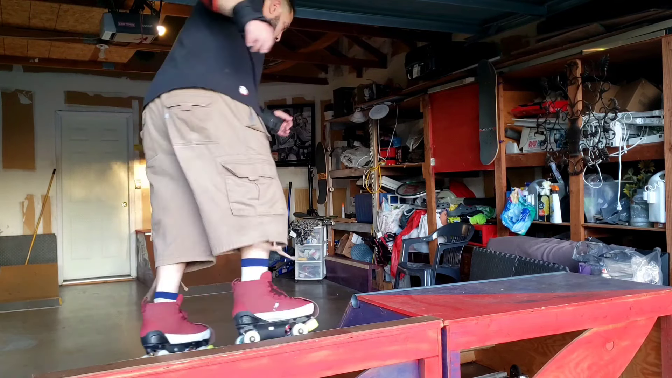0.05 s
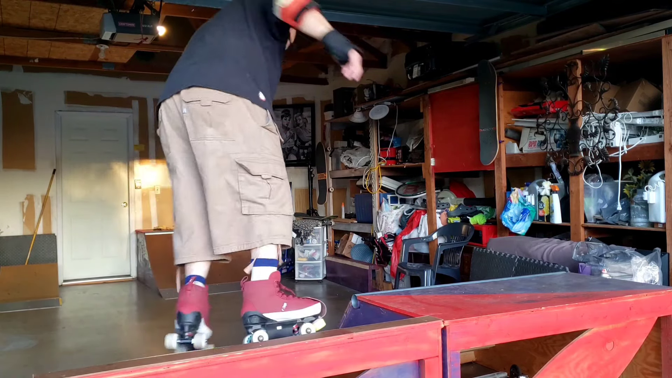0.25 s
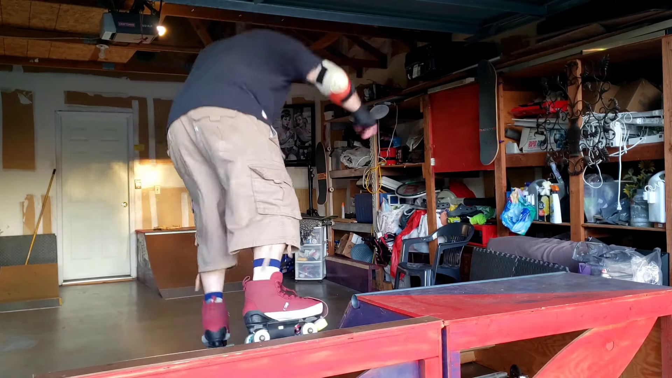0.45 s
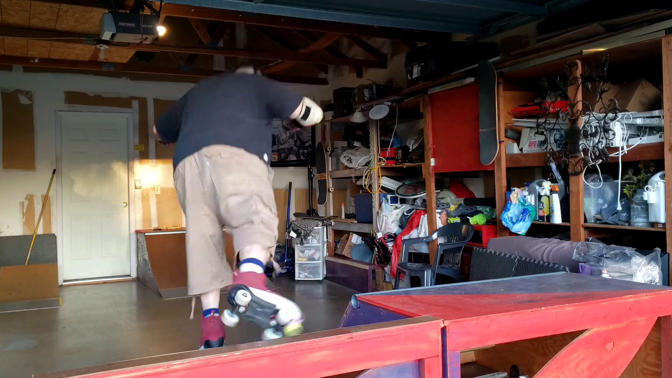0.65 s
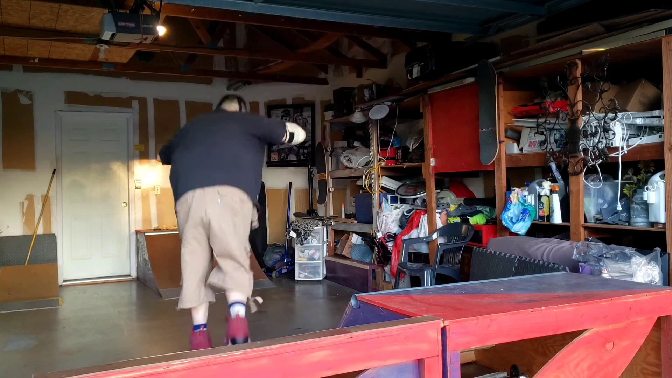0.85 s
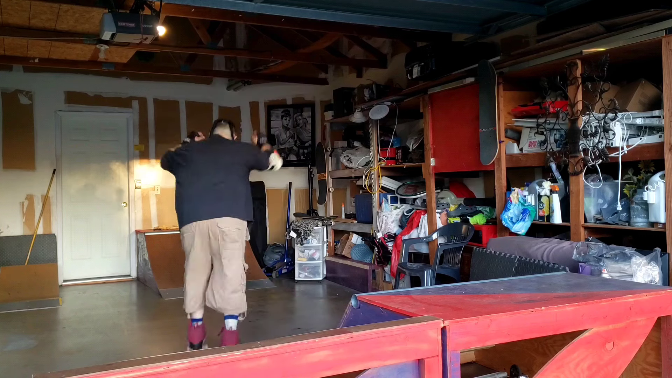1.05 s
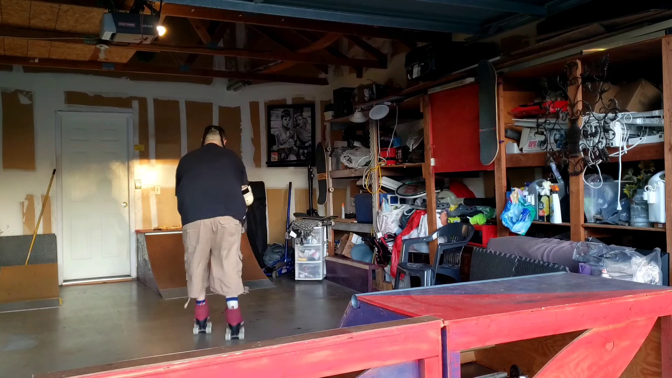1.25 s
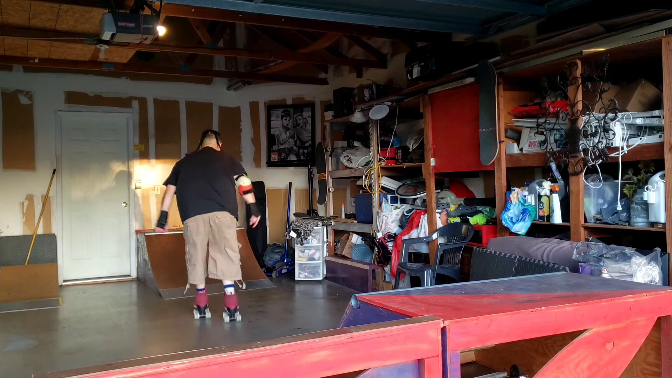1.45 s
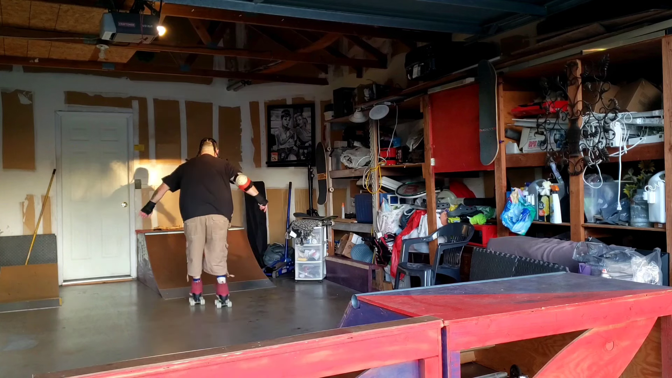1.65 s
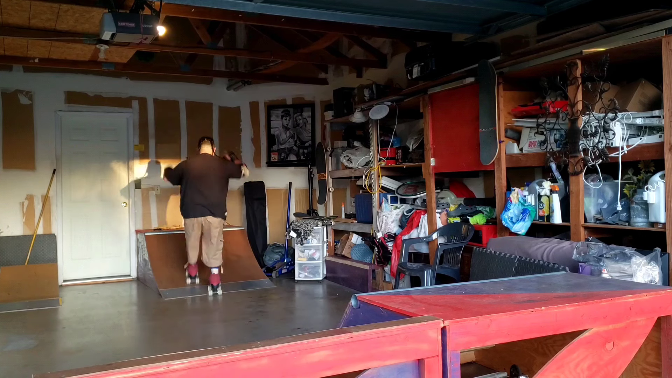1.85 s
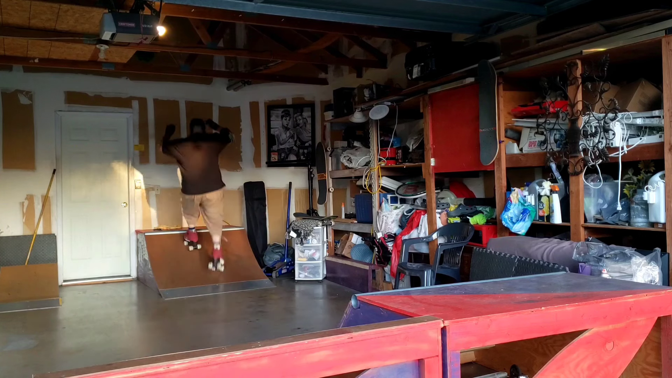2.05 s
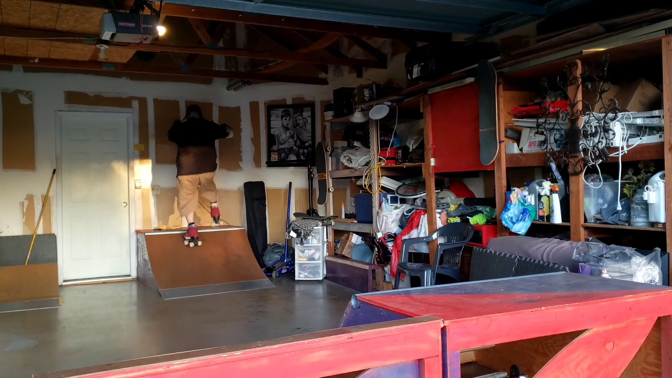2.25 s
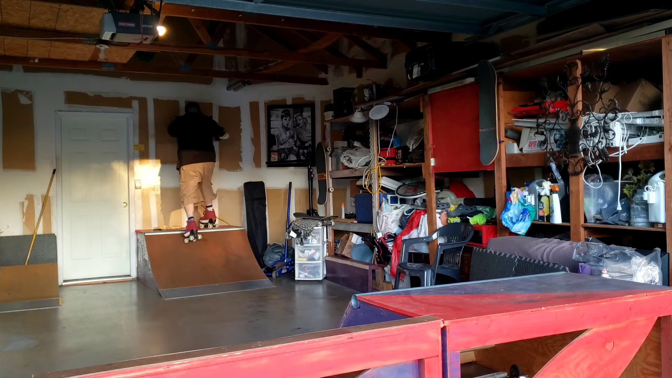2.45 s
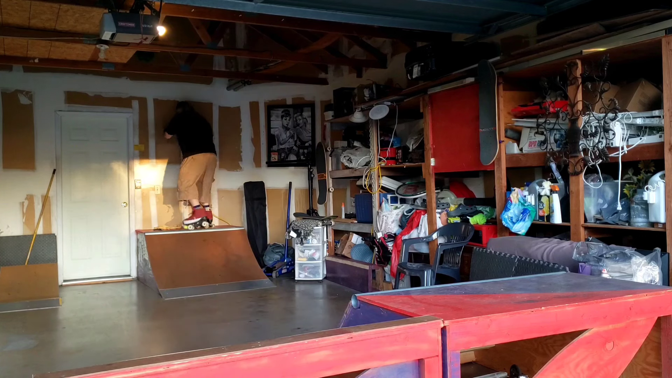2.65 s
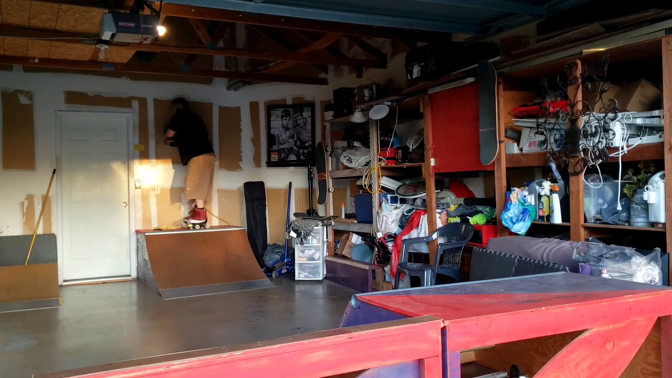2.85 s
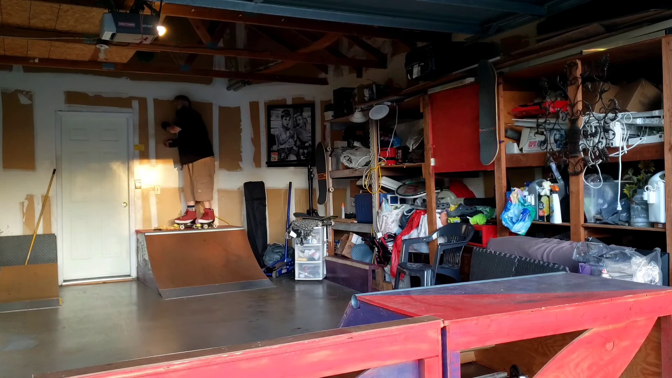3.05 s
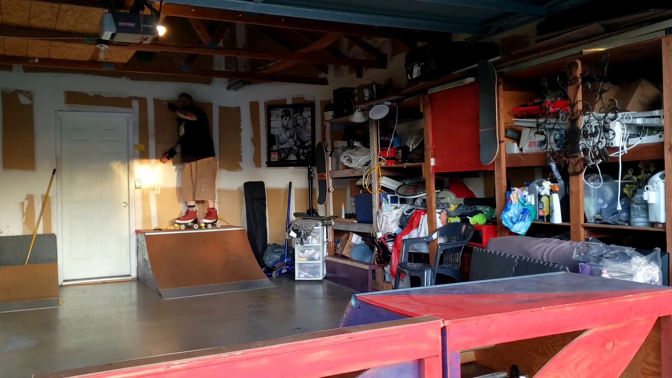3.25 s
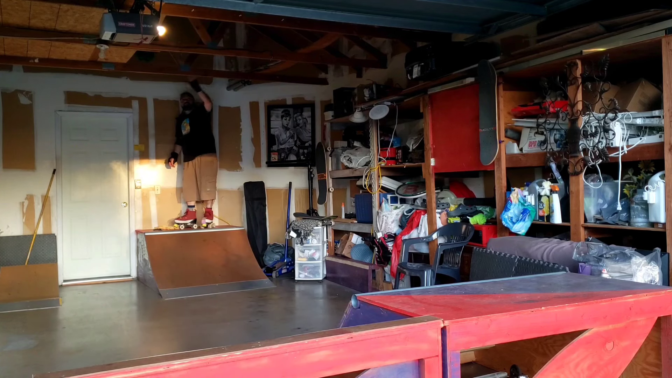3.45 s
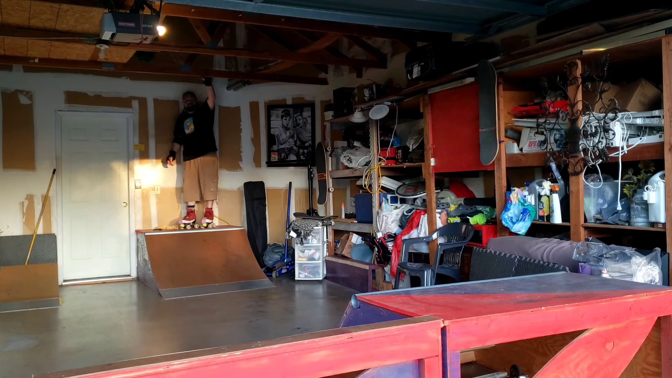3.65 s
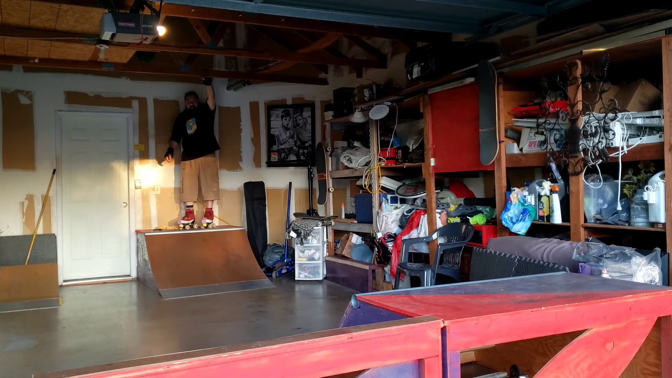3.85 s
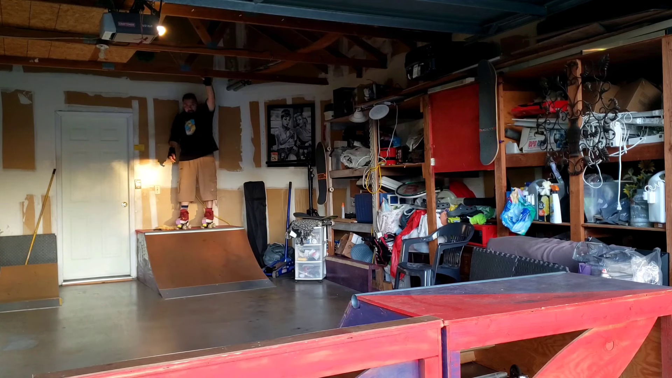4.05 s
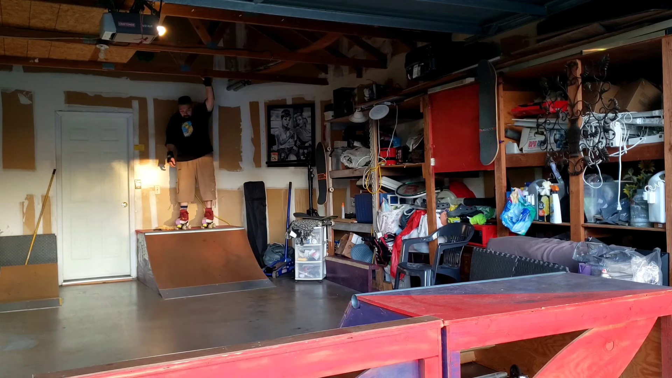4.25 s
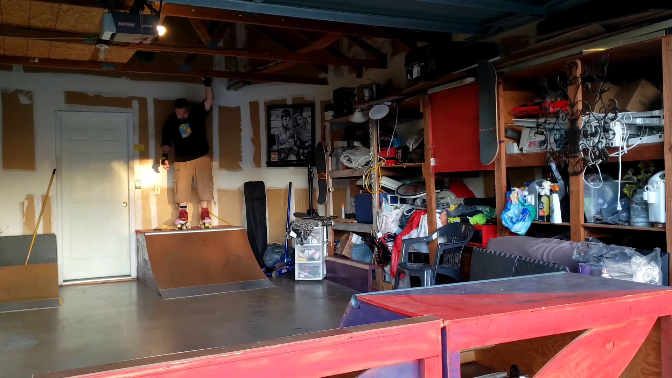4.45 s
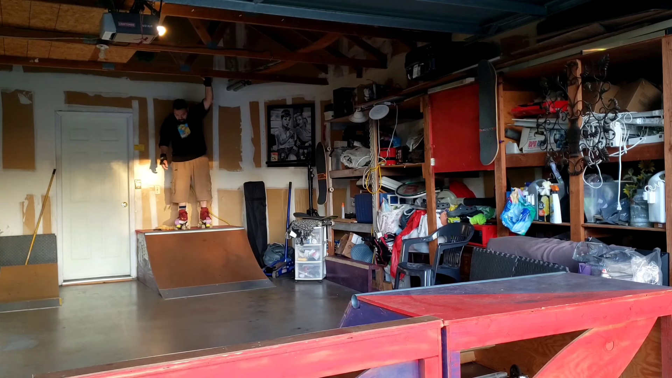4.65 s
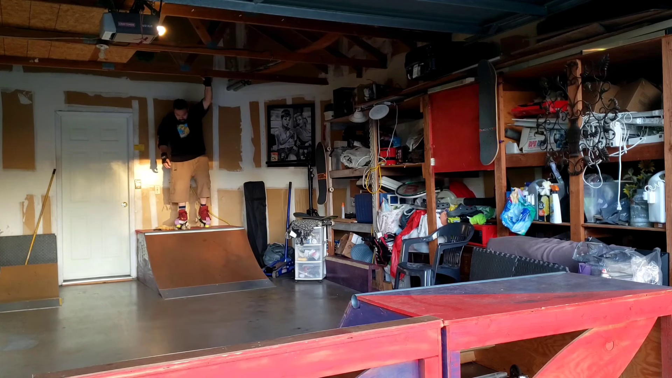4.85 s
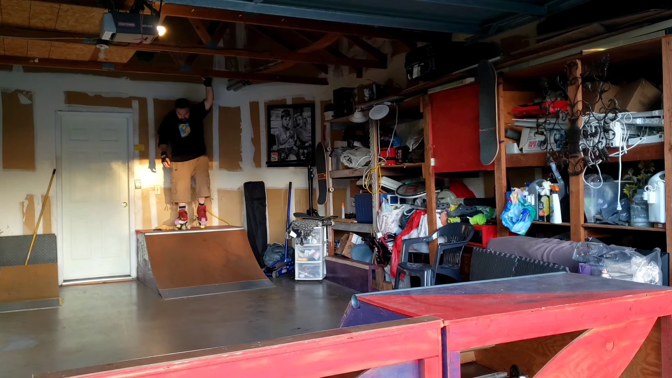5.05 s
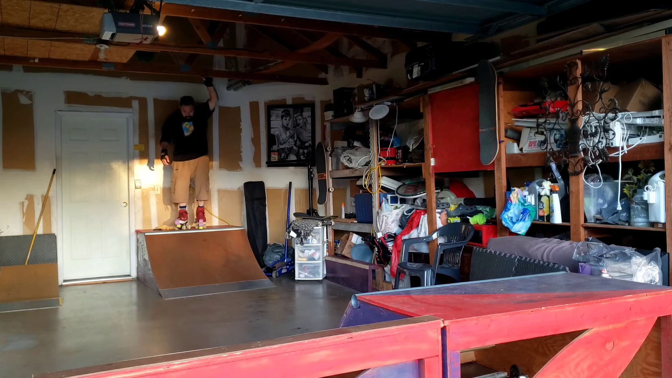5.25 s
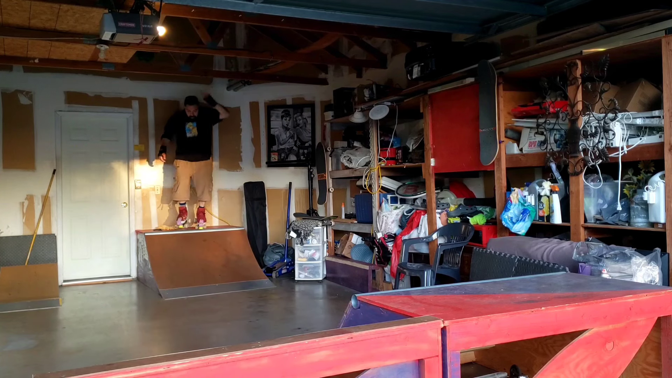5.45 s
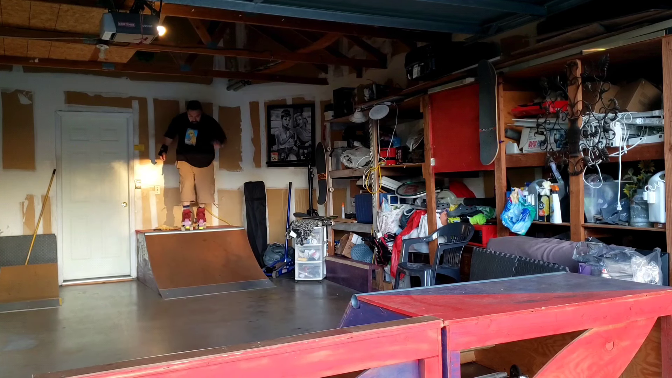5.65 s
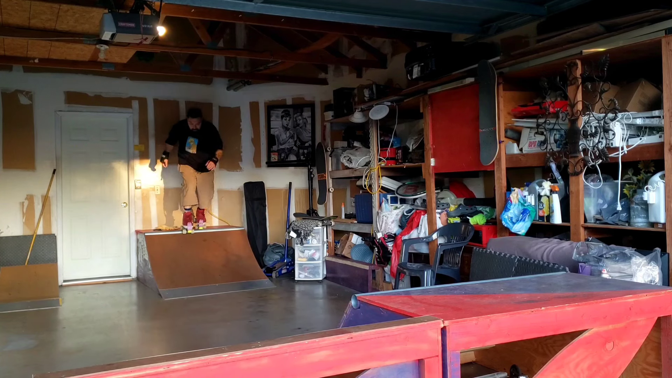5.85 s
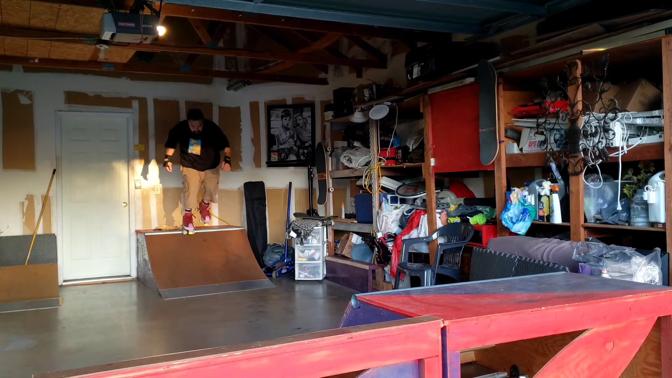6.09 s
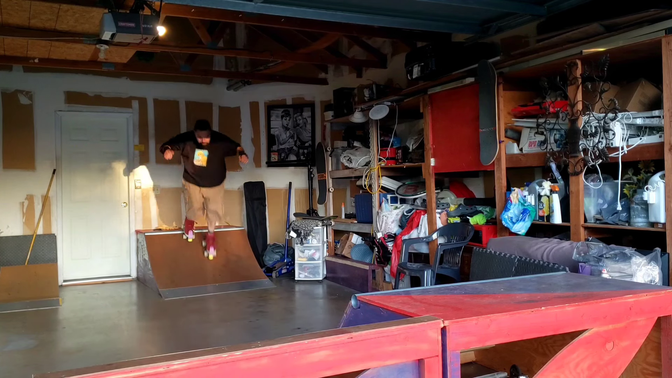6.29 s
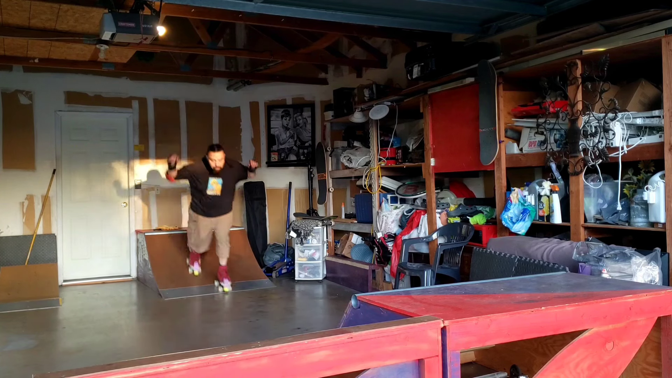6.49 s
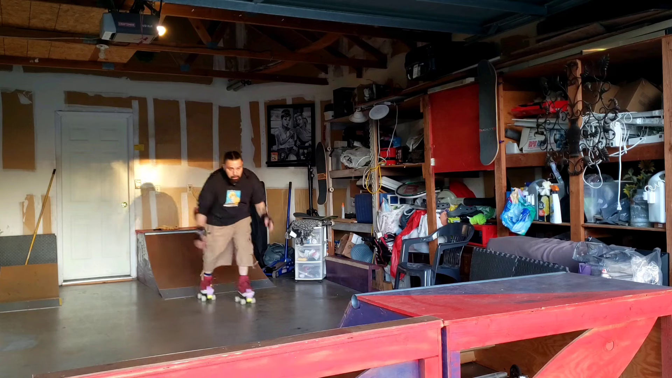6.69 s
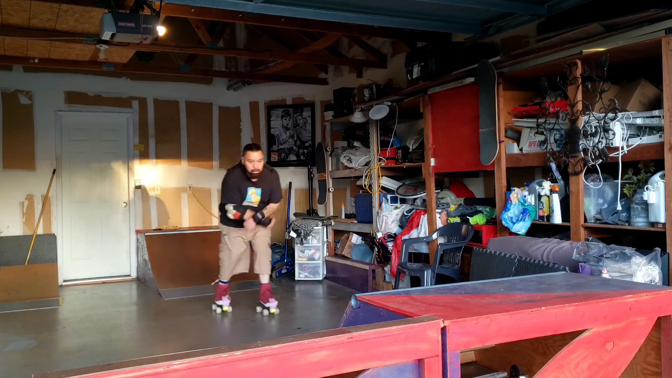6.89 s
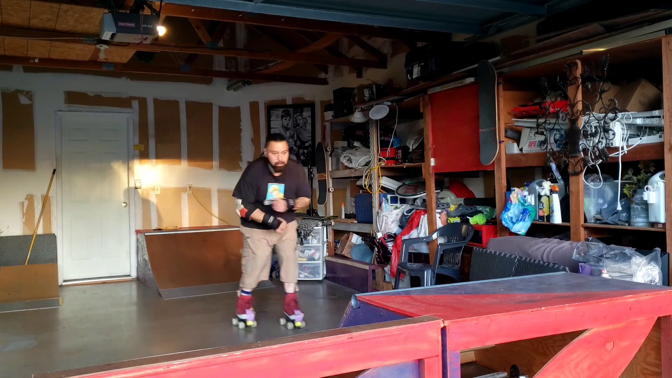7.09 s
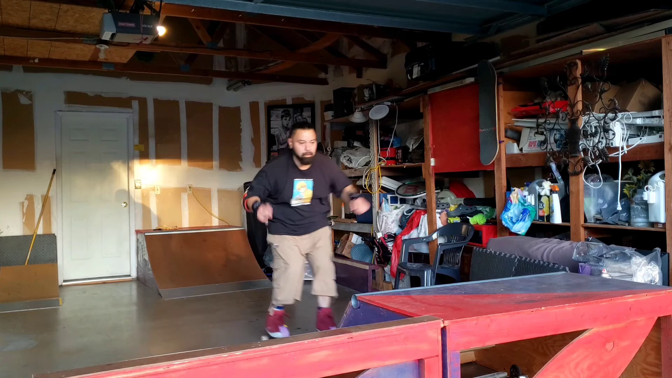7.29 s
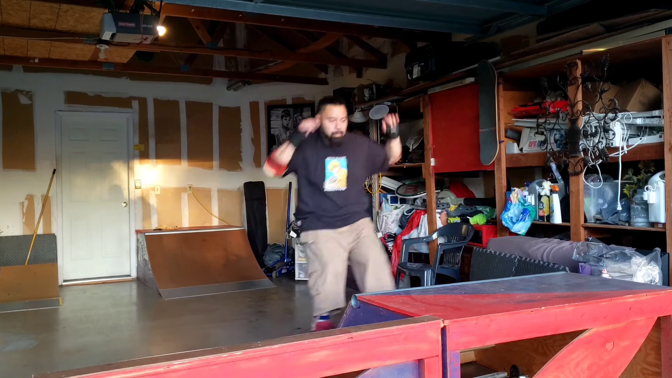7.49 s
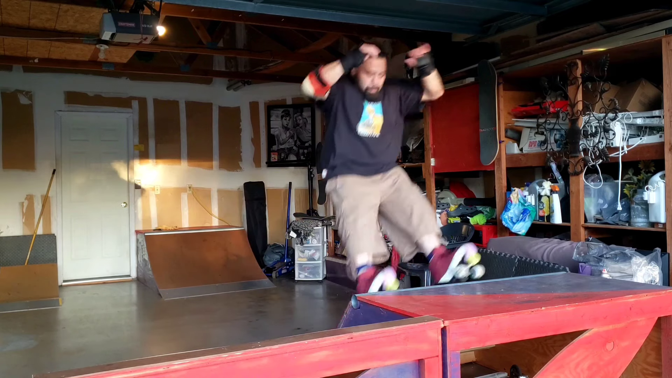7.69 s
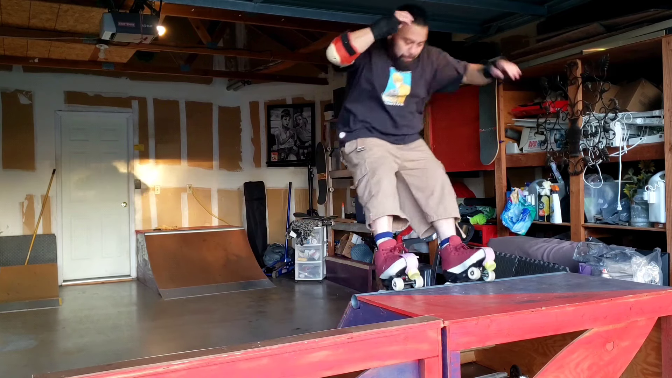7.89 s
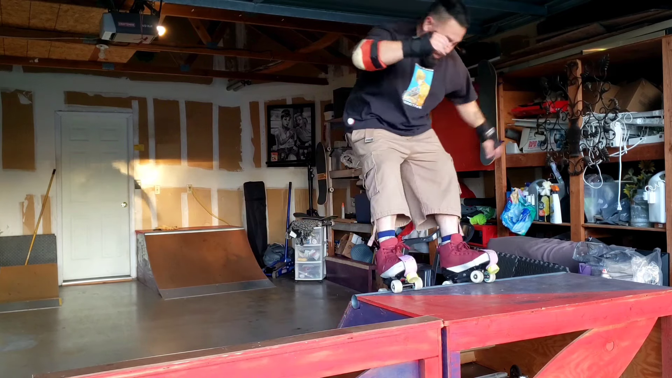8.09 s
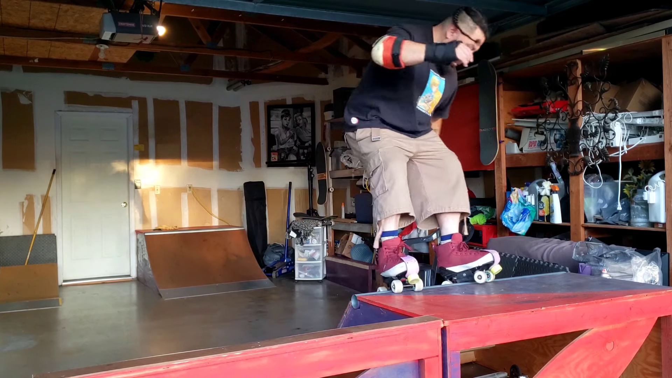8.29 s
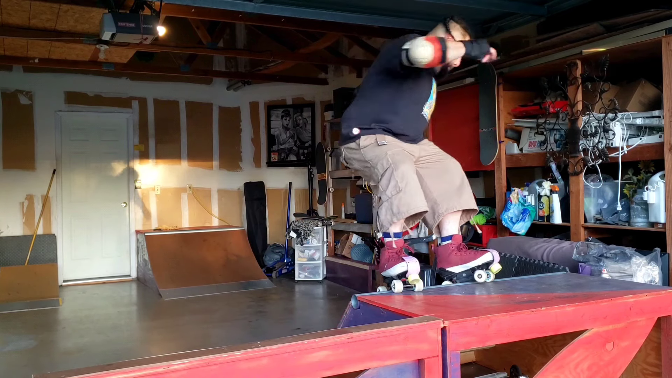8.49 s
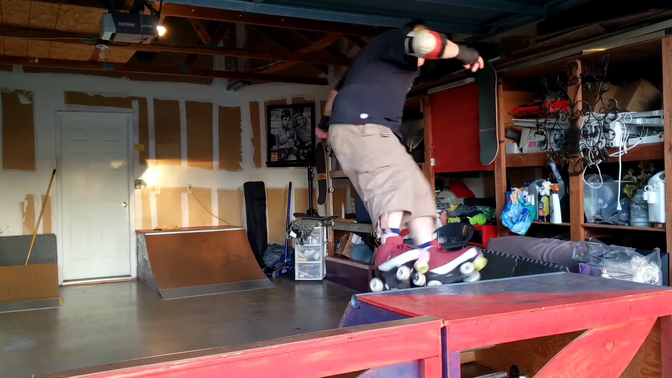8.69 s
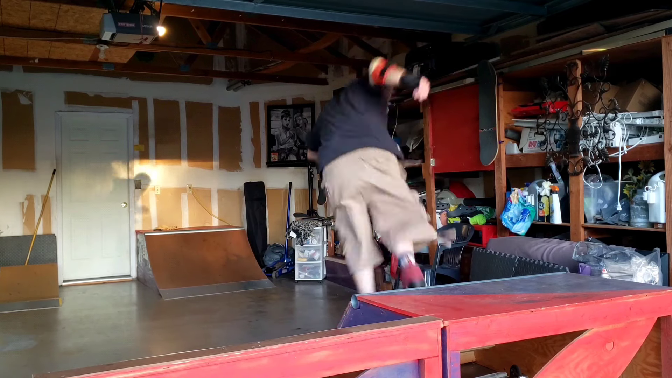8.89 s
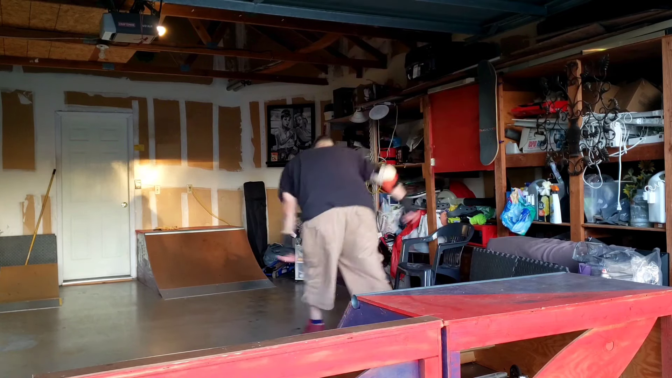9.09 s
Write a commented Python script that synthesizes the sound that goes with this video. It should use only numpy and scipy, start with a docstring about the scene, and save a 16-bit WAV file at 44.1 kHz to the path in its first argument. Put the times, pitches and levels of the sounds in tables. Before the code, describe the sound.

Roller skates shift on a plywood ramp close to the microphone, with light knocks, ticks and tiny squeaks. At about 1 second the wheels roll down with a loud clack and hollow thumping. Around 2 seconds they clatter onto a farther ramp, followed by a sharp, hard knock at 2.6 seconds. From 3 to 5.5 seconds there are only softer knocks and rattles, and a faint engine speeds up outside from about 4 to 6.5 seconds. Near 6 seconds the skates knock again, then clack and rumble down the far ramp until about 7. From 7.5 to 8 seconds they hit the near ramp with a loud run of booming thumps and rattles. A few faint squeaks follow, and a last heavy thud lands just after 9 seconds. The garage adds a short echo, and low traffic hum continues underneath.

```python
"""Skater in a concrete garage

A skater rolls to and fro between two plywood ramps, one close, one far. Wheels clack over edges,
loose trucks rattle, bearings squeak; the hollow ramps thump and boom while ridden. The garage
rings for about 0.4 s. Street noise and a passing engine come in from outside."""
import sys
import numpy as np
from scipy import signal
from scipy.fft import rfft, irfft, next_fast_len
from scipy.io import wavfile
from scipy.ndimage import uniform_filter1d

SR = 44100
rng = np.random.default_rng(int(sys.argv[2]) if len(sys.argv) > 2 else 0)


def store_pcm(level_fs):
    """Save levels as 16-bit WAV."""
    pcm = np.round(np.clip(level_fs, -1, 1) * 32767).astype(np.int16)
    wavfile.write(sys.argv[1], SR, np.atleast_2d(pcm).T)


N = 402633

# wheels and trucks striking edges: t/s, knock/dB, struck spot f/Hz, rattle/dB, tick/dB
STRIKES = [(.212, -35, 340, -50, -50), (.239, -29.5, 353, -42.5, -54), (.745, -36, 303, -57, -66),
           (1.051, -32, 332, -47, -56), (1.077, -31, 300, -41, -50), (1.086, -16, 340, -32.5, -43),
           (1.98, -32, 503, -36, -29), (1.987, -21.5, 630, -41, -37), (2.017, -19, 487, -29, -24),
           (2.07, -17, 316, -38.5, -26.5), (2.105, -18, 560, -33.5, -25.5), (2.23, -31, 450, -48, -81),
           (2.269, -35.5, 495, -47, -65), (2.622, -22.5, 364, -41.5, -59), (2.647, -10, 485, -19.5, -63),
           (2.875, -34.5, 310, -42, -48.5), (3.02, -28.5, 373, -39.5, -51), (3.031, -28.5, 394, -40.5, -56),
           (3.047, -23.5, 392, -41.5, -75), (3.245, -34.5, 384, -50, -64), (3.8, -25.5, 420, -44.5, -59),
           (4.262, -36, 300, -53.5, -68), (4.505, -52, 404, -60, -78), (4.603, -40.5, 445, -48.5, -67),
           (4.83, -46, 635, -52, -75), (5.11, -47, 474, -58, -89), (5.349, -44, 339, -46, -59),
           (5.435, -44, 425, -50, -76), (5.91, -23, 416, -40.5, -60), (5.944, -22, 845, -32, -69),
           (6.22, -43.5, 530, -48.5, -78), (6.38, -55, 412, -50.5, -86), (6.444, -37, 470, -48.5, -83),
           (6.462, -37.5, 320, -53.5, -73), (6.533, -16.5, 444, -31.5, -48), (6.605, -21, 464, -34.5, -48),
           (6.681, -16.5, 480, -34.5, -29), (6.715, -17.5, 480, -45, -46), (6.732, -25.5, 325, -29.5, -67),
           (6.824, -19.5, 483, -34, -35), (6.84, -26, 466, -51, -52), (7.05, -45.5, 344, -50.5, -57),
           (7.559, -31, 380, -53, -54), (7.565, -25, 397, -29, -30), (7.617, -29, 397, -28, -25.5),
           (7.671, -19, 310, -33, -34), (7.879, -15, 445, -27, -52), (7.929, -12, 830, -27.5, -39),
           (8.014, -24.5, 865, -32, -67), (8.247, -43.5, 301, -58, -62.5), (8.7, -42.5, 342, -60, -93),
           (9.112, -16, 332, -28, -41)]
# deck modes: f/Hz, level/dB, t60/s
DECK_MODES = [(279.7, -4, 0.053), (339.7, -2.5, 0.076), (414.7, 0.5, 0.04), (470, -5, 0.06),
              (573.5, -3, 0.03), (644, -4.5, 0.052), (756.5, -2.5, 0.043), (845, 0, 0.03),
              (971, 1.5, 0.021), (1147, -2.5, 0.031), (1323, 3, 0.016)]
# truck and wheel hardware spectra, mid to top treble: f/Hz, level/dB
RATTLE_SPECTRUM = [(600, -5.5), (1000, 5.5), (1600, 4), (2500, -2), (4200, -9.5), (6000, -24.5)]
CLICK_SPECTRUM = [(3300, -15), (4800, 6.5), (7800, 12), (9500, -25)]
TICK_SPECTRUM = [(7500, -16), (9000, 4.5), (15000, -9)]
# plywood thumps, from landings and wheels bumping over seams: t/s, level/dB, f/Hz
PLYWOOD_THUMPS = [(.21, -40, 232), (.235, -22.5, 150), (0.741, -36, 101), (.774, -28, 95), (1.054, -16.5, 214),
                  (1.081, -9, 172), (1.121, -12.5, 247), (1.167, -13.5, 208), (1.193, -13, 230),
                  (1.244, -26.5, 235), (2.043, -23, 273), (2.087, -20, 264), (2.14, -17.5, 142),
                  (2.205, -23, 144), (2.272, -21.5, 128), (2.647, -10, 148), (2.668, -15, 205.4),
                  (2.686, -15, 96.4), (2.885, -34, 112), (3.034, -28, 185), (3.254, -34.5, 344),
                  (3.58, -36.5, 307), (3.805, -32.5, 387), (3.849, -34.5, 176), (4.261, -33.5, 268),
                  (4.306, -37, 118), (5.913, -29.5, 347), (5.947, -22, 157), (6.537, -21, 133),
                  (6.607, -19.5, 171), (6.681, -10.5, 144), (6.723, -12.5, 159), (6.795, -17, 149),
                  (6.832, -24, 136), (7.565, -22.5, 164), (7.619, -9.5, 180), (7.664, -8.5, 188),
                  (7.697, -7, 173.5), (7.741, -10.5, 224), (7.884, -16.5, 183), (7.937, -12, 150),
                  (7.953, -17, 180), (8.016, -20.5, 178), (8.059, -24.5, 176), (8.253, -34.5, 107),
                  (9.108, -22, 175), (9.113, -8, 175)]
# air under a ramp: t/s, level/dB, f/Hz, hold/s
CAVITY_BOOMS = [(0.759, -36, 62.9, 0.052), (.905, -39, 63.3, 0.037), (1.05, -19.5, 73, .03),
                (1.148, -25, 66.7, 0.025), (1.269, -30.5, 72, 0.013), (2.03, -28.5, 54.2, 0.13),
                (2.28, -23.5, 55.3, 0.066), (2.651, -25, 67, .01), (2.885, -36, 64, 0.014),
                (3.051, -41.5, 66.8, 0.087), (3.81, -41, 53.8, 0.055), (5.94, -24, 56.7, 0.057),
                (6.465, -29, 56, .02), (6.551, -21.5, 55.3, .18), (6.84, -30, 54.8, .02),
                (7.62, -19.5, 77.8, 0.039), (7.75, -22.5, 71.4, 0.013), (7.894, -25, 71.7, 0.12)]
# rides over plywood: t/s, length/s, rolling/dB, its swell/(dB/s), hiss/dB, its swell/(dB/s)
RAMP_RIDES = [(.7, 0.18, -54, -5, -72.5, 7), (1.06, 0.17, -34.5, 31, -55.5, 48),
              (1.978, 0.12, -38, 14, -44, -5), (3.0, 0.14, -44.5, -27, -61, -35),
              (3.497, 0.054, -58, 63, -68, -35), (6.53, 0.34, -44.5, 25, -60.5, 31),
              (7.56, 0.17, -28, -47, -33, -110)]
# wheel grit and bearing hiss spectra: f/Hz, level/dB
GRIT_SPECTRUM = [(59, -44.5), (100, 3), (173, 1), (244, -2.5), (305, -15), (604, -7.5), (670, -16),
                 (755, -14.5), (1140, -23), (6000, -40.5), (7800, -77), (13200, -120)]
BEARING_SPECTRUM = [(2500, 2), (5000, 0.5), (9000, 9), (14000, 2)]
# plywood modes: f/Hz, level/dB, t60/s
PANEL_MODES = [(143, 6, 0.044), (185, 4, 0.057), (230, 0, 0.039), (277, -3, 0.093)]
# small hardware ticking: t/s, level/dB
HARDWARE_TICKS = [(0.012, -42.5), (.091, -52.5), (.099, -69), (0.315, -43.5), (.426, -40.5), (.631, -44.5),
                  (1.536, -49), (1.648, -57), (1.671, -54.5), (8.569, -58.5)]
# bearing and cushion squeaks: t/s, length/s, start f/Hz, end f/Hz, level/dB, bandwidth/Hz
SQUEAK_GLIDES = [(0.005, 0.011, 5360, 5500, -49, 201), (0.315, 0.0068, 3520, 3500, -49, 600),
                 (0.45, 0.075, 3580, 3090, -68, 200), (0.965, 0.062, 3570, 3160, -70, 250),
                 (5.353, 0.028, 4630, 4550, -59, 100), (5.428, 0.015, 4040, 3980, -57, 200),
                 (7.046, 0.034, 3330, 3450, -65, 150), (8.246, 0.045, 2450, 2300, -69, 300),
                 (8.436, 0.055, 2090, 2050, -66, 496), (8.875, 0.175, 2760, 2700, -76, 60)]
# skater's path: t/s, direct gain/dB, left over right/dB
SKATER_PATH = [(0, 2, 3), (1.302, 2, 2), (1.9, -3, 2), (2.5, -3, 3), (3.5, -12, 2.5), (5.7, -1.5, 4),
               (6.4, -3, 2.5), (7.401, 0.5, 2), (9.2, -7.5, 2)]
# garage decay: f/Hz, t60/s
GARAGE_T60 = [(60, 0.21), (160, 0.39), (420, 0.43), (1100, 0.38), (2900, 0.36), (7700, 0.35), (14000, 0.33)]
# diffuse sound: f/Hz, left-right coherence
COHERENCE = [(60, 0.83), (250, .96), (500, 0.75), (1000, 0.12), (2000, 0.063), (8000, 0.056)]
# traffic spectrum: f/Hz, level/dB
STREET_SPECTRUM = [(18, -62), (30, -3.5), (59, 6.5), (154, -9), (180, -5), (240, -12.5), (426, -19.5),
                   (497, -19), (978, -26), (1920, -39.5), (4200, -45.5), (8470, -47.5), (9890, -48.5),
                   (13900, -46.5), (15000, -63)]
# traffic swell: t/s, level/dB, treble gain/dB
STREET_SWELL = [(0, -44, 3), (1.5, -40, 0.5), (2.502, -43, 1), (3.4, -43, 2), (4.3, -45, -5), (5, -42, -5),
                (5.502, -37.5, -9.5), (6.3, -40, -5), (7.2, -36.5, -4.5), (8.3, -44, -2), (9.2, -43.5, 0.5)]
# passing engine: t/s, firing f/Hz, level/dB
ENGINE_PASS = [(4.1, 76.2, -67), (4.5, 81.45, -59.5), (5.0, 90.4, -54.5), (5.6, 102.5, -55),
               (6.2, 107.5, -52.5), (6.7, 108.1, -56)]
# engine harmonics: multiple of firing rate, level/dB
ENGINE_HARMONICS = [(1, 6), (2, -1), (3, 6), (4, -1.5), (5, 2.5), (6, -3)]
# microphone response: f/Hz, gain/dB
MIC_RESPONSE = [(18, -22.5), (33, -9.5), (60, -4), (6500, 5.5), (7800, -2), (8600, -12), (9600, -5),
                (11500, 2), (14000, 0.5)]


def gain(db):
    """dB to amplitude factor."""
    return 10 ** (np.asarray(db) / 20)


def unit_rms(x):
    """Scale to rms 1."""
    return x / np.sqrt(np.mean(x ** 2) + 1e-20)


def lookup(table, hz):
    """Interpolate over log frequency."""
    table_hz, value = np.transpose(table)
    return np.interp(np.log(hz + 1), np.log(table_hz + 1), value)


def curves(table, t):
    """Interpolate each column at times t/s."""
    table_s, *columns = np.transpose(table)
    return [np.interp(t, table_s, column) for column in columns]


def filtered(x, spectrum):
    """Apply a dB spectrum."""
    size = x.shape[-1]
    return irfft(rfft(x) * gain(lookup(spectrum, np.fft.rfftfreq(size, 1 / SR))), size)


def noise(size, spectrum):
    """Coloured noise, rms 1."""
    return unit_rms(filtered(rng.standard_normal(size), spectrum))


def diffuse_noise(field_db):
    """Stereo noise from a bins x frames field, coherent in the bass."""
    a, b, c, d = rng.standard_normal((field_db.shape[1], len(field_db), 4)).T
    hz = np.linspace(0, SR / 2, len(field_db))
    coherence = np.clip(lookup(COHERENCE, hz), 0, 1)[:, None]
    left = a + 1j * b
    right = coherence * left + np.sqrt(1 - coherence ** 2) * (c + 1j * d)
    size = 2 * len(field_db) - 2
    return signal.istft(gain(field_db) * [left, right], nperseg=size, noverlap=3 * size // 4)[1]


def add(mix, start_s, sound):
    """Mix in at start_s."""
    part = mix[round(start_s * SR):][:len(sound)]
    part += sound[:len(part)]


def deck_knock(t, spot_hz, contact_s):
    """Struck deck, peak 1; modes near the spot's pitch ring loudest."""
    phases = rng.uniform(0, 2 * np.pi, len(DECK_MODES))
    ring = np.zeros(len(t))
    for (hz, db, t60_s), phase in zip(DECK_MODES, phases):
        octaves_off = abs(np.log2(hz / spot_hz))
        ring += gain(db - 8.1 * octaves_off - 60 * t / t60_s) * np.sin(2 * np.pi * hz * t + phase)
    knock = ring * (1 - np.exp(-t / (0.00056 + contact_s)))
    return knock / abs(knock).max()


def wheel_clacks():
    """Strikes ring the deck, jolt and rattle the trucks. Returns stereo direct, mono garage send."""
    direct, send, t = np.zeros((2, N)), np.zeros(N), np.arange(3072) / SR
    crack = gain(-60 * t / 0.036)
    shake = gain(-60 * t / 0.062) * (1 - np.exp(-t / 0.001))  # loose parts settle later
    taper = signal.windows.tukey(2 * len(t), 0.5)[len(t):]
    spectra = RATTLE_SPECTRUM, CLICK_SPECTRUM, TICK_SPECTRUM
    pulses = [unit_rms(filtered(signal.unit_impulse(len(t), idx=64), band)) for band in spectra]
    for start_s, knock_db, spot_hz, rattle_db, tick_db in STRIKES:
        click_db = rattle_db + 0.41 * (tick_db - rattle_db) - 10
        levels = gain([rattle_db, click_db, tick_db])
        contact_s = 0.00058 * gain(0.64 * (-15.5 - knock_db))  # weak strikes scuff longer
        knock = gain(knock_db) * deck_knock(t, spot_hz, contact_s)
        rattles = np.zeros((2, len(t)))
        for rattle in rattles:
            for level, band, envelope in zip(levels, spectra, (crack, shake, shake)):
                rattle += level * envelope * noise(len(t), band)
        rattles *= 1 - np.exp(-t / contact_s)
        scuff = rfft(rng.standard_normal(len(t)) * np.exp(-t / contact_s))
        jolt = sum(level * pulse for level, pulse in zip(levels, pulses))
        jolt = irfft(rfft(jolt) * scuff / abs(scuff), len(t)) * taper  # all-pass smear
        impact = knock + gain(-18.5) * jolt
        add(direct[0], start_s, impact + rattles[0])
        add(direct[1], start_s, impact + 0.5 * rattles[0] + 0.87 * rattles[1])
        add(send, start_s, gain(-2) * knock + gain(-13.5) * jolt)
    return direct, send


def panel_thumps(rise_s=0.0024, t60_cycles=10.6):
    """Soft wheels load a plywood panel; two modes ring briefly."""
    out, t = np.zeros(N), np.arange(12000) / SR
    for start_s, db, hz in PLYWOOD_THUMPS:
        ring = np.sin(2 * np.pi * hz * t) + 0.19 * np.sin(2 * np.pi * 1.386 * hz * t)
        envelope = (1 - np.exp(-t / rise_s)) * gain(-60 * t * hz / t60_cycles)
        add(out, start_s, gain(db) * ring * envelope / envelope.max())
    return out


def ramp_booms(rise_s=0.022, fall_db_per_s=159):
    """Air under a ramp booms; the pitch wanders as the load moves."""
    out, t = np.zeros(N), np.arange(SR * 3 // 5) / SR
    for start_s, db, hz, hold_s in CAVITY_BOOMS:
        wander = unit_rms(uniform_filter1d(rng.standard_normal(len(t)), 900))
        tone = np.sqrt(2) * np.sin(2 * np.pi * np.cumsum(hz * (1 + 0.15 * wander)) / SR)
        rise = np.sin(np.pi / 2 * np.minimum(t / rise_s, 1)) ** 2
        fall_db = fall_db_per_s * np.maximum(t - rise_s - hold_s, 0)
        add(out, start_s, rise * gain(db - fall_db) * tone)
    return out


def panel_bumps(size, bumps_per_s=70, spread_db=1.5):
    """Random bumps under the wheels, each ringing one plywood mode."""
    out, t = np.zeros(size), np.arange(4000) / SR
    chance, pick, strength = rng.random((size, 3)).T
    hits = (chance < bumps_per_s / SR) * gain(-spread_db * np.log(1 - 0.98 * strength))
    mode = np.floor(pick * len(PANEL_MODES))
    for k, (hz, db, t60_s) in enumerate(PANEL_MODES):
        ring = gain(db - 60 * t / t60_s) * np.sin(2 * np.pi * hz * t)
        out += signal.oaconvolve(hits * (mode == k), ring)[:size]
    return out


def wheel_roll(rise_s=0.0123, fall_db_per_s=298):
    """Wheels grind over plywood grain: uneven grit, bumps, bearing hiss."""
    out, t = np.zeros(N), np.arange(SR // 2) / SR
    for start_s, length_s, roll_db, roll_db_per_s, hiss_db, hiss_db_per_s in RAMP_RIDES:
        ridden_s = np.minimum(t, length_s)
        envelope = np.minimum(t / rise_s, 1) * gain(-fall_db_per_s * (t - ridden_s))
        grit, fizz, grain = rng.standard_normal((len(t), 3)).T
        roughness = gain(3 * unit_rms(uniform_filter1d(grain, 200)))
        body = roughness * unit_rms(filtered(grit, GRIT_SPECTRUM)) + gain(3.5) * panel_bumps(len(t))
        body *= gain(roll_db + roll_db_per_s * ridden_s)
        hiss = roughness * unit_rms(filtered(fizz, BEARING_SPECTRUM))
        hiss *= gain(hiss_db + hiss_db_per_s * ridden_s)
        add(out, start_s, envelope * (body + hiss))
    return out


def hardware_ticks(rise_s=0.003, t60_s=0.054):
    """Small parts tick as a skate is lifted or shaken: short treble bursts."""
    out, t = np.zeros(N), np.arange(3072) / SR
    for start_s, db in HARDWARE_TICKS:
        top, body = rng.standard_normal((len(t), 2)).T
        top = unit_rms(filtered(top, TICK_SPECTRUM))
        body = gain(-2.5) * unit_rms(filtered(body, CLICK_SPECTRUM))
        envelope = (1 - np.exp(-t / rise_s)) * gain(db - 60 * t / t60_s)
        add(out, start_s, envelope * (top + body))
    return out


def bearing_squeaks():
    """Bearings and cushions squeak: narrow noise on a gliding pitch."""
    out = np.zeros(N)
    for start_s, length_s, start_hz, end_hz, db, bandwidth_hz in SQUEAK_GLIDES:
        hz = np.linspace(start_hz, end_hz, round(length_s * SR))
        pole = np.exp(-np.pi * bandwidth_hz / SR)
        real, imag = signal.lfilter([1], [1, -pole], rng.standard_normal((len(hz), 2)).T)
        tone = ((real + 1j * imag) * np.exp(2j * np.pi * np.cumsum(hz) / SR)).real
        add(out, start_s, gain(db) * unit_rms(tone) * signal.windows.tukey(len(hz), 0.4))
    return out


def garage_reverb(send, tails=4, crossfade_s=0.045):
    """Dense tails, t60 by band; the send crossfades through several of them in turn."""
    t, hz = np.arange(260) * 128 / SR, np.fft.rfftfreq(512, 1 / SR)
    position = np.arange(N) / SR / crossfade_s
    out = np.zeros((2, N))
    for k in range(tails):
        tail = diffuse_noise(-60 * t / lookup(GARAGE_T60, hz)[:, None])
        tail *= np.clip((np.arange(tail.shape[1]) / SR - 0.001) / 0.001, 0, 1)  # 1 ms gap, 1 ms rise
        tail /= np.linalg.norm(tail[0])
        share = np.cos(np.pi / 2 * np.minimum(abs((position - k) % tails - tails / 2), 1))
        out += signal.fftconvolve((share * send)[None], tail, axes=1)[:, :N]
    return out


def street_noise():
    """Distant traffic: patchy rumble, swelling slowly."""
    t, hz = np.arange(N // 256 + 5) * 256 / SR, np.fft.rfftfreq(1024, 1 / SR)
    level_db, treble_db = curves(STREET_SWELL, t)
    patches = rng.standard_normal((len(t), len(hz))).T
    patches_db = 1.9 * unit_rms(uniform_filter1d(uniform_filter1d(patches, 8, axis=0), 12, axis=1))
    shelf = np.clip(np.log2(hz / 900 + 1e-9), 0, 1)[:, None]
    colour_db = lookup(STREET_SPECTRUM, hz)[:, None]
    colour_db -= 10 * np.log10(np.sum(gain(2 * colour_db)))  # unit total power
    field_db = colour_db + patches_db + level_db + shelf * treble_db
    return diffuse_noise(field_db)[:, :N] * np.sqrt(2 / 3) * gain([[0.8], [-0.8]])


def passing_engine(roar_db=4):
    """Far engine speeding up, to the right: wavering firing harmonics and tyre roar."""
    start_s, end_s = ENGINE_PASS[0][0], ENGINE_PASS[-1][0]
    firing_hz, db = curves(ENGINE_PASS, np.arange(start_s, end_s, 1 / SR))
    out, size = np.zeros(N), len(firing_hz)
    cycles = np.cumsum(firing_hz) / SR
    wavers = uniform_filter1d(rng.standard_normal((size, len(ENGINE_HARMONICS))), 4000, axis=0).T
    tone = sum(gain(harmonic_db + unit_rms(waver)) * np.sin(2 * np.pi * k * cycles)
               for (k, harmonic_db), waver in zip(ENGINE_HARMONICS, wavers))
    roar = gain(roar_db) * noise(size, STREET_SPECTRUM)
    add(out, start_s, gain(db) * (unit_rms(tone) + roar) * signal.windows.tukey(size, 0.3))
    return gain([[-1.5], [1.5]]) * [np.roll(out, shift=18), out]


def scene():
    """Skater's direct sound by distance, garage reverb, engine and street."""
    direct_db, side_db = curves(SKATER_PATH, np.arange(N) / SR)
    clacks, clack_send = wheel_clacks()
    roll, ticks, thumps, squeaks = wheel_roll(), hardware_ticks(), panel_thumps(), bearing_squeaks()
    direct = gain(direct_db) * (clacks + roll + ticks + squeaks)
    direct += gain(0.5 * direct_db) * thumps + ramp_booms()
    direct[1] = np.roll(direct[1], shift=4)  # left leads
    send = (gain(2) * clack_send + gain(0.5) * roll + gain(-2.5) * ticks
            + gain(-13) * squeaks + gain(-0.5) * thumps)
    inside = (direct + garage_reverb(send)) * gain([side_db / 2, -side_db / 2])
    return inside + passing_engine() + street_noise()


def record(dry):
    """Microphone response with a treble dip, then low-pass."""
    cutoff_hz = 14750
    padded = np.pad(dry, ((0, 0), (0, next_fast_len(N + 4096) - N)))
    heard = filtered(padded, MIC_RESPONSE)[:, :N]
    lowpass = signal.firwin(511, cutoff_hz, window=("kaiser", 9), fs=SR)
    return signal.oaconvolve(heard, lowpass[None], "same")


dry = scene()
out = record(dry)
store_pcm(out)
```